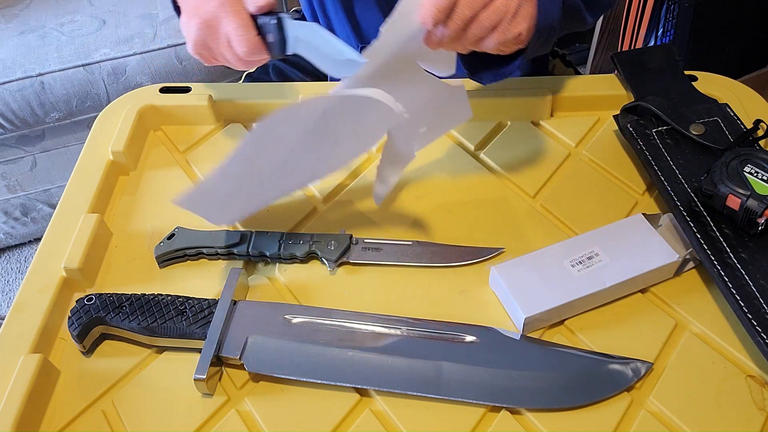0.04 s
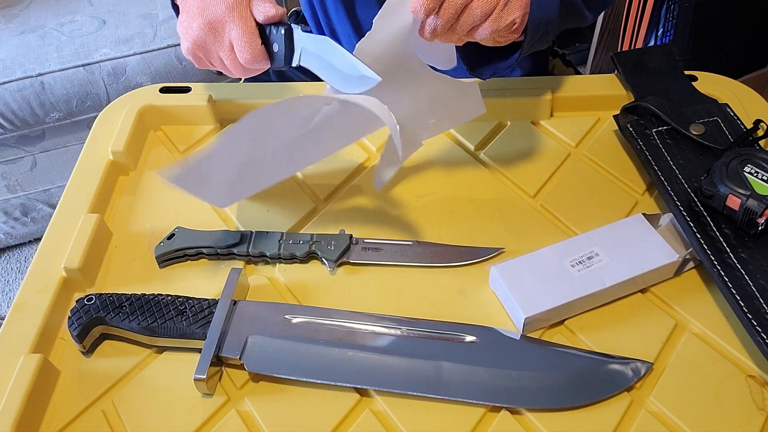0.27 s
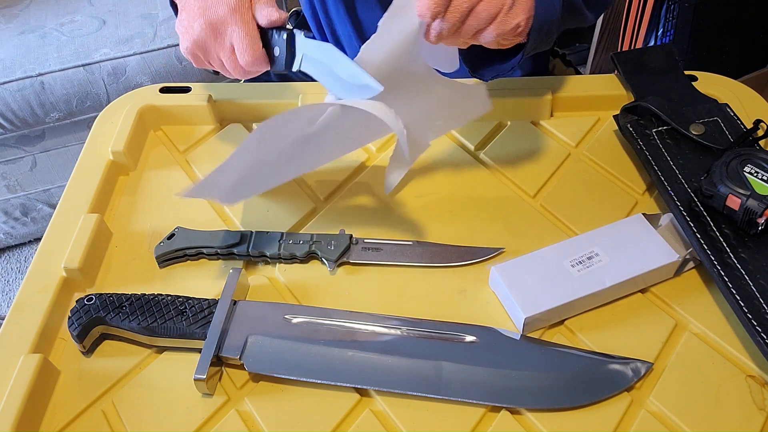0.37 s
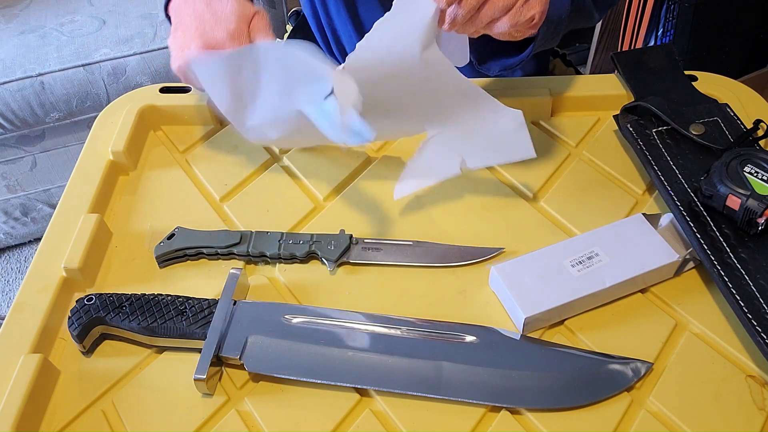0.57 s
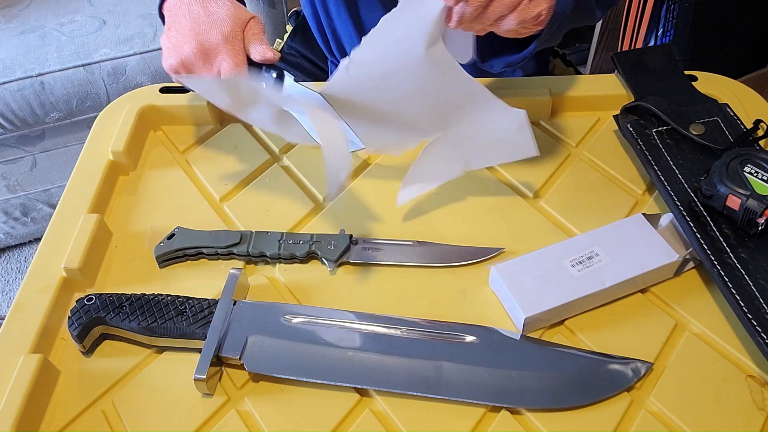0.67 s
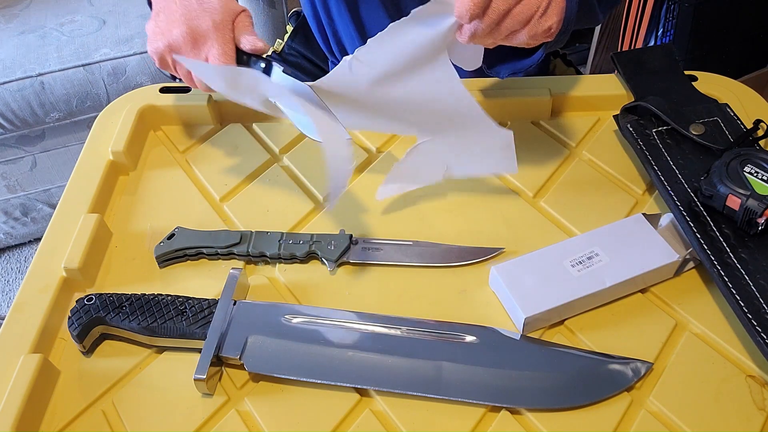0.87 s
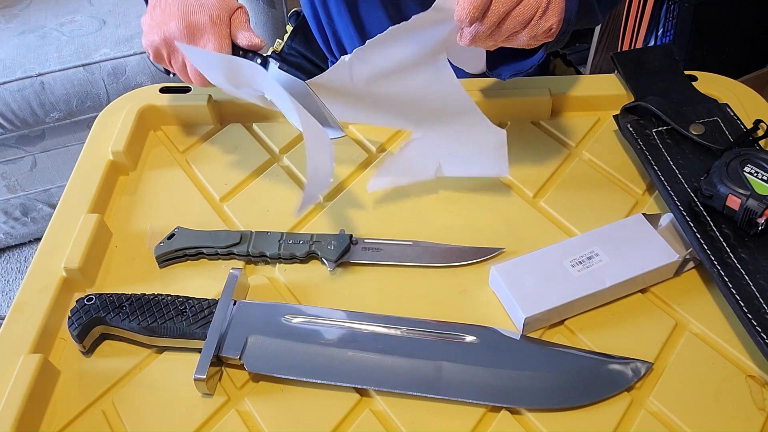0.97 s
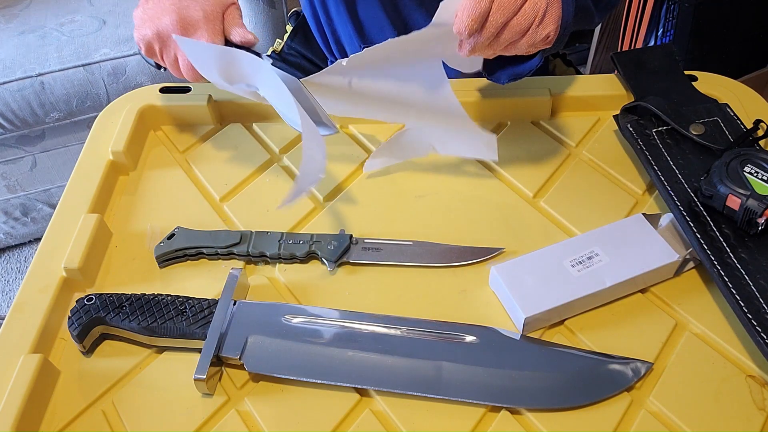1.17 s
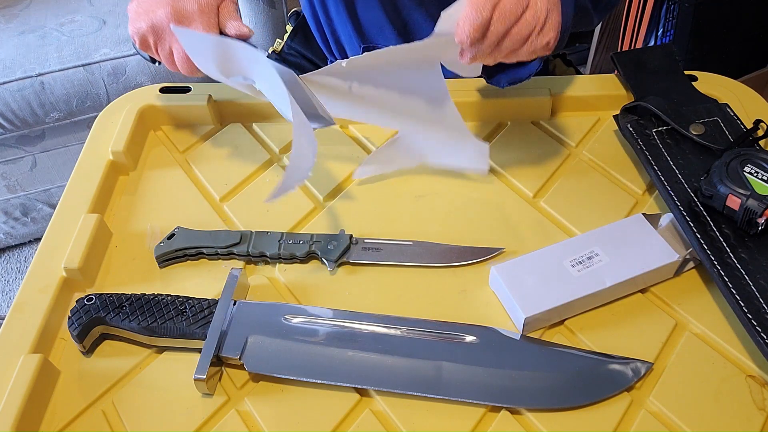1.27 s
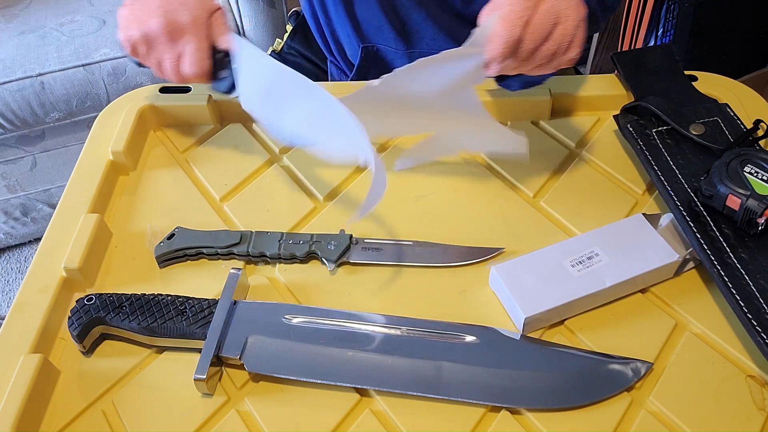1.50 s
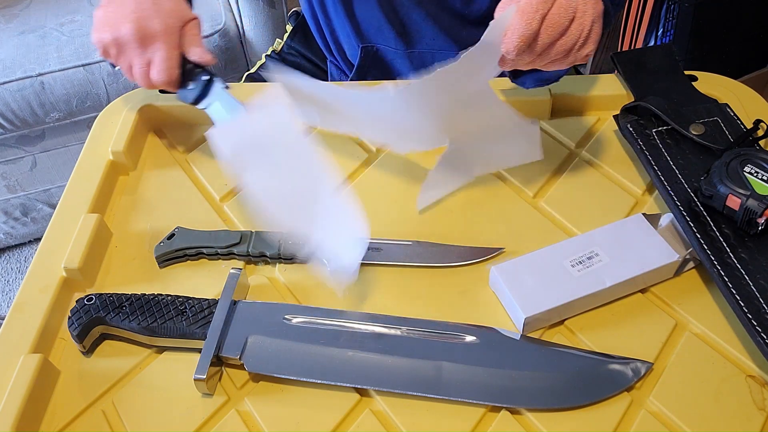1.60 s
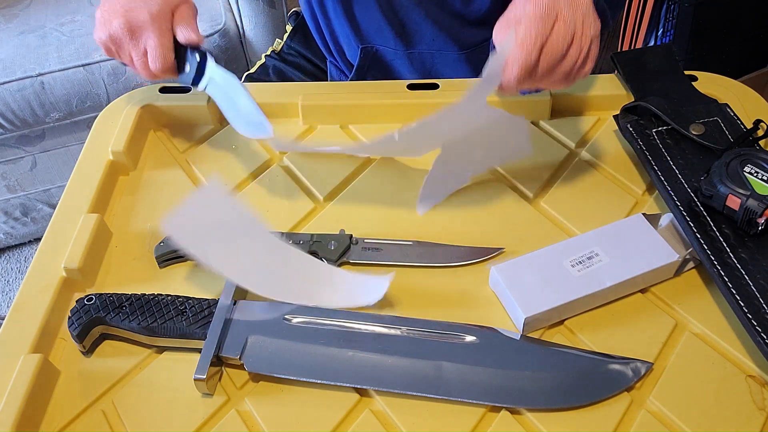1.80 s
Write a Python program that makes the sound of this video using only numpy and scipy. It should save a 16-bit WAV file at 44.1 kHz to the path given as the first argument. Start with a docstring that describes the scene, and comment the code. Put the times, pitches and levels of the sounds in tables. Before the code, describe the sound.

A dull knife cuts through a sheet of paper close by in a quiet room. Dry scrapes build to a crackling rip, the sheet snaps and flaps, then a bright slice ends with a faint tap on plastic.

```python
"""A faint, dry scrape comes first: a dull knife entering a hand-held sheet of paper.
The edge scrapes, cuts, snags and rips, then slices free: parting fibres hiss while uneven slips
rattle the sheet. Along the way the paper flaps softly, buckles with sharp snaps and drums when taut.
The steel sings faintly in the last slice, and the offcut drops onto a plastic tub lid below.
The lid and a small, quiet room colour the paper's sound."""
import sys
import numpy as np
from scipy import signal
from scipy.fft import rfft, irfft, next_fast_len
from scipy.io import wavfile
from scipy.ndimage import uniform_filter1d

SR = 44100
rng = np.random.default_rng(int(sys.argv[2]) if len(sys.argv) > 2 else 0)


def wav_record(signal):
    """Record a signal, one row per channel, as 16-bit PCM in the file named by sys.argv[1]."""
    frames = np.transpose(np.atleast_2d(signal))
    bounded = np.clip(frames, -1, 1)
    # unit amplitude maps onto the largest positive 16-bit level
    quanta = np.round(bounded * 32767).astype(np.int16)
    wavfile.write(sys.argv[1], SR, quanta)


N = 81585


def amp(db):
    """Decibels to linear gain."""
    return 10 ** (np.asarray(db) / 20)


def unit_rms(x):
    """Normalises to an RMS of 1."""
    return x / np.sqrt(np.mean(x ** 2) + 1e-20)


def steadied(x, size=700):
    """Keeps the grain but holds the slow level at 1."""
    return x / np.sqrt(abs(uniform_filter1d((x ** 2).mean(0), size)) + 1e-12)


def add(mix, start_s, sound):
    """Lays a sound into the mix."""
    part = mix[:, max(round(start_s * SR), 0):][:, :sound.shape[-1]]
    part += sound[..., :part.shape[1]]


def bins(size=4096):
    """The frequency grid for EQ curves, in Hz."""
    return np.fft.rfftfreq(size, 1 / SR)


def curve_at(points, hz):
    """Joins breakpoints along a log-frequency axis."""
    point_hz, value = np.transpose(points)
    return np.interp(np.log(hz + 1), np.log(point_hz), value)


def below(hz, edge_hz, order=4):
    """Low-pass slope in dB; swap the arguments for a high-pass."""
    return -10 * np.log10(1 + ((hz + 1) / (edge_hz + 1)) ** (2 * order))


def bump(hz, centre_hz, width_hz):
    """Shape of one resonance, 1 at its centre."""
    return 1 / (1 + (2 * (hz - centre_hz) / width_hz) ** 2)


def eq(x, gain_db):
    """Causal filter with the given gain on bins()."""
    log_gain = np.log(amp(np.maximum(gain_db, -100)))
    mirrored = np.concatenate([log_gain, log_gain[-2:0:-1]])
    taps = np.fft.ifft(np.exp(signal.hilbert(mirrored).conj())).real
    return signal.fftconvolve(np.atleast_2d(x), taps[None], axes=1)[:, :x.shape[-1]]


def close_up(x, lead_s=.00004):
    """A near source reaches the left microphone slightly earlier."""
    size = next_fast_len(2 * x.shape[-1])
    lead = np.exp(1j * np.pi * bins(size) * lead_s * np.array([[1], [-1]]))
    return irfft(rfft(x, size) * lead, size)[:, :x.shape[-1]]


def clicks(per_s, spread_db=4.5):
    """Random clicks of uneven strength and either sign."""
    strength = amp(spread_db * np.clip(rng.standard_normal(N), -2, 2))
    return strength * rng.choice([-1, 1], N) * (rng.random(N) < per_s / SR)


SPLIT_HZ = 2650  # the sheet radiates the slips below this, the fibres hiss above it


def stroke(faders, spectrum, slips_per_s, rasp_trim_db, hiss_trim_db):
    """The edge sticks and slips, rattling the sheet, while fibres part in a dense fizz."""
    times, hiss_db, rasp_db = np.transpose(faders)
    t, hz = np.arange(N) / SR, bins()
    tone = curve_at(spectrum, hz) + below(92, hz, order=2)
    slips = clicks(slips_per_s)
    rasp = close_up(steadied(eq(slips, tone + below(hz, SPLIT_HZ))))
    left, right, centre = (clicks(per_s=7000) for _ in range(3))
    centre_share, flutter_depth = 0.11, 0.11
    fibres = np.sqrt(1 - centre_share) * np.array([left, right]) + np.sqrt(centre_share) * centre
    flutter = 1 + flutter_depth * unit_rms(uniform_filter1d(abs(slips), size=40)) ** 2
    hiss = steadied(eq(fibres * flutter, tone + below(SPLIT_HZ, hz)))
    air_band = below(hz, 64) + below(64, hz, order=1)  # low air pushed by the moving sheet
    air = amp(-38) * unit_rms(eq(rng.standard_normal(N), air_band))
    contact = uniform_filter1d(1. * ((t >= times[0]) & (t <= times[-1])), size=160)
    rasp_gain = amp(rasp_trim_db + np.interp(t, times, rasp_db))
    hiss_gain = amp(hiss_trim_db + np.interp(t, times, hiss_db))
    return contact * ((rasp + air) * rasp_gain + hiss * hiss_gain)


# Fader moves for each stroke, before its trims: (time [s], fibre hiss [dB], sheet rasp [dB])
ENTER = [(0, -54, -65), (.035, -62, -68.5), (.09, -45.5, -51.5), (.135, -42, -43.5), (.199, -51, -47),
         (.204, -37.5, -38), (.255, -33.5, -32), (.272, -36.5, -42.5), (.288, -52.5, -73)]
SCRAPE = [(.285, -58, -51), (.31, -40, -37.5), (.326, -45.5, -60), (.335, -37, -40.5), (.365, -31.5, -30.5),
          (.39, -33.5, -32), (.415, -38, -39), (.433, -33.5, -30), (.468, -43, -45.5), (.498, -33.5, -39),
          (.555, -40, -44.5)]
CUT = [(.552, -62, -43.5), (.565, -29, -32.5), (.625, -27.5, -29.5), (.675, -31, -34), (.703, -28.5, -34.5),
       (.722, -34, -34.5), (.745, -64, -51), (.78, -67.5, -88)]
RIP = [(.808, -51, -50), (.823, -40, -46), (.829, -34.5, -26), (.848, -30, -30), (.858, -28.5, -28),
       (.876, -24, -20.5), (.903, -28.5, -24), (.925, -33.5, -30.5), (.96, -49, -49.5), (1.02, -58, -70),
       (1.075, -66, -71)]
CREASE = [(1.075, -49, -65), (1.084, -43.5, -41), (1.096, -41, -44), (1.104, -63, -68), (1.122, -54, -57),
          (1.128, -37.5, -39), (1.147, -45, -51), (1.168, -35, -34), (1.185, -69, -69),
          (1.21, -72.5, -74.5)]
BEND = [(1.245, -56, -68), (1.275, -41, -51), (1.3, -53, -61), (1.318, -47, -37), (1.338, -54, -61),
        (1.36, -49, -35), (1.395, -52, -73), (1.408, -51, -39), (1.422, -53, -51.5), (1.44, -38, -29)]
SLICE = [(1.44, -44, -31.5), (1.463, -36, -40), (1.482, -28.5, -32.5), (1.51, -24, -34),
         (1.543, -23, -32.5), (1.568, -23, -31.5), (1.59, -38, -30), (1.62, -47.5, -39.5), (1.65, -52, -49)]
SLIDE = [(1.63, -48, -45), (1.665, -44, -51.5), (1.69, -42.5, -41.5), (1.718, -41, -58), (1.735, -53, -46),
         (1.775, -50.5, -62.5), (1.8, -55.5, -64), (1.815, -45, -53), (1.85, -50.5, -63)]
# Tone of each kind of contact: (frequency [Hz], gain [dB])
SCRAPE_EQ = [(110, -20.5), (190, -17.5), (260, -9.5), (400, -4.5), (750, 1), (1500, 0.5), (2200, -4.5),
             (3800, -14.5), (4320, -9.5), (4750, -15.5), (5750, -12.5), (7800, -15.5), (9000, -21),
             (11500, -16.5), (15500, -15.5)]
CUT_EQ = [(100, -26), (260, -8.5), (650, -4), (1100, -0.5), (1700, -1), (2200, -2), (3000, -10),
          (4400, -9.5), (7800, -10.5), (9000, -19), (11500, -11.5), (15500, -13.5)]
RIP_EQ = [(100, -18.5), (250, -9.5), (400, -1.5), (800, -1), (1100, -0.5), (1700, -0.5), (2230, 0),
          (2800, -11.5), (7500, -15), (9000, -21.5), (11500, -17.5), (15500, -20.5)]
CREASE_EQ = [(170, -18), (290, -9), (420, -7), (800, -3), (1300, -6), (1900, -2), (3300, -13),
             (4800, -13.5), (7500, -15.5), (9000, -19), (15500, -20.5)]
SLICE_EQ = [(100, -22), (260, -9.5), (400, -1.5), (1100, -1.5), (1800, 2.5), (3400, -3), (4400, -1.5),
            (6300, -3), (8050, 0.5), (8500, -7.5), (11500, -5), (15500, -4.5)]


def knife_strokes():
    """The dull edge works through the sheet in eight strokes, each with its own grain."""
    return (stroke(ENTER, SCRAPE_EQ, slips_per_s=1600, rasp_trim_db=-3.0, hiss_trim_db=1.3)
            + stroke(SCRAPE, SCRAPE_EQ, slips_per_s=1660, rasp_trim_db=-2.0, hiss_trim_db=1.34)
            + stroke(CUT, CUT_EQ, slips_per_s=2600, rasp_trim_db=1.25, hiss_trim_db=1.9)
            + stroke(RIP, RIP_EQ, slips_per_s=1140, rasp_trim_db=-0.3, hiss_trim_db=0.3)
            + stroke(CREASE, CREASE_EQ, slips_per_s=1200, rasp_trim_db=-1.8, hiss_trim_db=0.3)
            + stroke(BEND, CREASE_EQ, slips_per_s=1020, rasp_trim_db=-4.0, hiss_trim_db=-4.5)
            + stroke(SLICE, SLICE_EQ, slips_per_s=2400, rasp_trim_db=0.23, hiss_trim_db=1.14)
            + stroke(SLIDE, CREASE_EQ, slips_per_s=1600, rasp_trim_db=0.4, hiss_trim_db=-0.4))


# Stereo image of the room: (frequency [Hz], left-right likeness [0-1])
LIKENESS = [(50, 0.81), (400, 0.57), (900, 0.14), (1700, 0.11), (3000, 0.043), (16000, .03)]


def diffuse_noise(size):
    """Noise from all round: narrow in the bass, wide in the treble."""
    mid, side = rfft(rng.standard_normal((2, size)))
    likeness = curve_at(LIKENESS, bins(size))
    mid *= np.sqrt((1 + likeness) / 2)
    side *= np.sqrt((1 - likeness) / 2)
    return irfft(np.array([mid + side, mid - side]), size)


# Colour of the quiet room: (frequency [Hz], gain [dB])
ROOM_TONE_EQ = [(20, -23), (60, 5), (110, -0.5), (300, -14.5), (1000, -2), (4000, -23), (15500, -21)]


def room_tone():
    """A faint, steady bed of dark noise."""
    return amp(-66) * unit_rms(eq(diffuse_noise(N), curve_at(ROOM_TONE_EQ, bins())))


# Soft swings and quick jerks of the whole sheet: (time [s], level [dB], decay [s], high cut [Hz])
FLAPS = [(0.129, -53.5, 0.15, 400), (0.221, -39, 0.046, 674), (.88, -47, 0.013, 327),
         (1.031, -34.5, 0.013, 1950), (1.16, -42, 0.012, 600), (1.346, -22, 0.0037, 1680),
         (1.4407, -22, .0028, 1680), (1.637, -40.5, 0.0093, 380)]


def flap(db, decay_s, high_cut_hz, low_cut_hz=267, attack_s=0.0016, size=12288):
    """The loose sheet swings and beats the air."""
    t, hz = np.arange(size) / SR, bins()
    band = below(hz, high_cut_hz) + below(low_cut_hz, hz, order=3)
    puff = steadied(eq(rng.standard_normal(size), band))
    return close_up(puff * amp(db) * (1 - np.exp(-t / attack_s)) * np.exp(-t / decay_s))


# Tone of a snap's bright crack: (frequency [Hz], gain [dB])
CRACK_EQ = [(120, -42), (450, -10), (1500, -9.5), (2800, -3.5), (7500, -3), (9500, -13.5), (15500, -7.5)]
# The sheet buckles: (time [s], pop level [dB], crack level [dB], pop pitch [Hz], crack pitch [Hz])
SNAPS = [(0.142, -26.5, -40, 1360, 4300), (0.1438, -25.5, -46, 1450, 4330),
         (0.2474, -21.5, -25, 1250, 4350), (0.2503, -23, -40, 2330, 5630), (0.3052, -34, -27, 1600, 6340),
         (0.3393, -44, -25, 1470, 4350), (0.3555, -30, -25, 1390, 5650), (0.3839, -24, -21.5, 1410, 5650),
         (0.431, -45, -22, 1140, 4370), (0.562, -33, -21.5, 1530, 5700), (0.8113, -52, -33.5, 1700, 4530),
         (0.8281, -23, -24.5, 1740, 7000), (0.8583, -13.5, -30, 1750, 3300),
         (0.8681, -13.5, -39, 1640, 4500), (0.8732, -14.5, -30, 2030, 5040), (0.8752, -13, -14, 1760, 5030),
         (1.0850, -33, -32, 1950, 6450), (1.1244, -28.5, -21.5, 1830, 4900), (1.142, -35, -31, 1920, 6560),
         (1.151, -29, -29, 1920, 6440), (1.1633, -34.5, -38, 1110, 6500),
         (1.2204, -34.5, -29.5, 2060, 5360), (1.2713, -40, -31.5, 1830, 6900),
         (1.309, -23.5, -28, 1710, 3420), (1.3463, -24, -20, 1320, 4580), (1.3546, -27, -27.5, 1260, 4440),
         (1.4410, -14, -14.5, 1220, 2720), (1.4786, -24, -17.5, 900, 7000), (1.56, -25, -11, 1360, 4300),
         (1.5684, -24, -23, 730, 6960), (1.6389, -28.5, -36, 1290, 4470),
         (1.6814, -33.5, -26.5, 1610, 3950), (1.7113, -46, -27, 1765, 5000)]


def snap(pop_db, crack_db, pop_hz, crack_hz, size=1024):
    """A facet of the sheet flips: a few cycles of pop and a bright crack."""
    t, hz = np.arange(size) / SR, bins()
    pop_attack_s, pop_decay_s, grit_mix = 0.0013, 0.00079, 0.39
    body = (1 - np.exp(-t / pop_attack_s)) * np.exp(-t / pop_decay_s)
    body /= body.max()
    grit = eq(rng.standard_normal(size) * body, below(hz, SPLIT_HZ))
    pop = body * np.sin(2 * np.pi * pop_hz * t) + grit_mix * unit_rms(grit) * body.std()
    pop = eq(pop, below(403, hz, order=3))  # a small facet radiates no bass
    crack_attack_s, crack_decay_s, lift_db = 0.0005, 0.0015, 9
    fade = np.exp(-t / crack_decay_s)
    burst = rng.standard_normal((2, size)) * fade * (1 - np.exp(-t / crack_attack_s))
    tone = curve_at(CRACK_EQ, hz) + lift_db * bump(hz, crack_hz, width_hz=820)
    crack = unit_rms(eq(burst, tone)) * fade.std()
    return amp(pop_db) * close_up(pop) + amp(crack_db) * crack


# Tugged taut, the sheet drums at a pitch set by its tension and free length:
# (time [s], level [dB], pitch [Hz], decay [s])
DRUMS = [(.697, -35, 353, 0.017), (.874, -27, 848, 0.015), (.882, -28, 650, 0.0081),
         (1.032, -44.5, 337, .014), (1.032, -37.5, 1089, 0.01), (1.125, -38, 1100, .008),
         (1.477, -27.5, 338, .007), (1.562, -27.5, 654, 0.011)]


def thump(db, hz, decay_s, attack_s=0.0011, size=8192):
    """One low mode of the sheet or the lid, softly struck."""
    t = np.arange(size) / SR
    return amp(db) * np.sin(2 * np.pi * hz * t) * (1 - np.exp(-t / attack_s)) * np.exp(-t / decay_s)


# High modes of the steel: (pitch [Hz], level [dB])
BLADE_MODES = [(6534, -45), (7175, -31), (7658, -44), (8035, -35)]


def blade_sing(peak_s=1.546, spread_s=0.012):
    """Friction keeps the blade ringing for a moment as the last slice speeds up."""
    t, hz = np.arange(N) / SR, bins(N)
    ring = np.zeros((2, N))
    for mode_hz, db in BLADE_MODES:
        friction = rfft(rng.standard_normal((2, N)))
        ring += amp(db) * unit_rms(irfft(friction * bump(hz, mode_hz, width_hz=20), N))
    return ring * np.exp(-.5 * ((t - peak_s) / spread_s) ** 2)


# Low modes of the hollow lid: (time [s], level [dB], pitch [Hz], decay [s])
LANDING = [(1.713, -43, 243, .027), (1.714, -48, 165, .018), (1.714, -48, 400, .014)]


def offcut_landing():
    """The offcut drops and rings the lid with a soft, hollow tap."""
    tap = np.zeros((2, N))
    for start_s, *mode in LANDING:
        add(tap, start_s, thump(*mode))
    return tap


# Resonances of the lid, in matching lists: (frequency [Hz]) and (boost [dB])
LID_HZ = [297, 620, 1070, 1447, 1594, 1714, 2241]
LID_BOOST_DB = [3.9, 2.2, 2.6, 2.5, 1.8, 3.4, 2.3]
# Pitches cancelled by the bounce off the lid: (frequency [Hz])
NOTCH_HZ = [496, 979]


def lid_colour(x, shelf_db=-1.5, notch_db=-5):
    """The plastic lid under the sheet adds narrow peaks and notches, over a slight low-shelf cut."""
    hz = bins()
    peaks = sum(db * bump(hz, f, width_hz=58) for f, db in zip(LID_HZ, LID_BOOST_DB))
    shelf = shelf_db * amp(below(hz, SPLIT_HZ))
    notches = notch_db * sum(bump(hz, f, width_hz=43) for f in NOTCH_HZ)
    return eq(x, peaks + shelf + notches)


def early_reflections(x, count=6, span_s=.009, low_cut_hz=1200):
    """Quick, bright bounces off hands, lid and body, different at each microphone."""
    taps = np.zeros((2, 1024))
    for side in taps:
        delays = (rng.uniform(.15, 1, count) * span_s * SR).astype(int)
        side[delays] = rng.choice([-1, 1], count) / np.sqrt(count)
    bounces = signal.fftconvolve(x, taps, axes=1)[:, :N]
    return eq(bounces, below(low_cut_hz, bins(), order=2))


# Reverb length: (frequency [Hz], time to fall 60 dB [s])
ROOM_T60 = [(150, 0.4), (400, 0.22), (1500, 0.17), (4000, 0.19), (15000, 0.15)]


def room_reverb(x, fade_in_s=0.0016, size=16384):
    """A short, soft tail from the lid and the furnished room."""
    hz, t, noise = signal.stft(diffuse_noise(size), SR, nperseg=256)
    decay = amp(-60 * t / curve_at(ROOM_T60, hz)[:, None])
    tail = signal.istft(noise * decay, SR, nperseg=256)[1]
    tail *= np.minimum(np.arange(tail.shape[1]) / SR / fade_in_s, 1)
    return signal.fftconvolve(x, tail / np.linalg.norm(tail[0]), axes=1)[:, :N]


def scene():
    """Paper and blade feed the reflections and reverb; the landing and room tone stay dry."""
    paper = knife_strokes()
    for cues, voice in (FLAPS, flap), (SNAPS, snap), (DRUMS, thump):
        for start_s, *settings in cues:
            add(paper, start_s, voice(*settings))
    direct = lid_colour(paper) + blade_sing()
    wet = amp(-11) * early_reflections(direct) + amp(-7.5) * room_reverb(direct)
    return direct + wet + offcut_landing() + room_tone()


def record(dry):
    """A steep high cut takes the very top off the mix."""
    high_cut = signal.firwin(511, 15740, window=("kaiser", 8), fs=SR)
    return signal.oaconvolve(dry, high_cut[None], "same")


dry = scene()
out = record(dry)
wav_record(out)
```